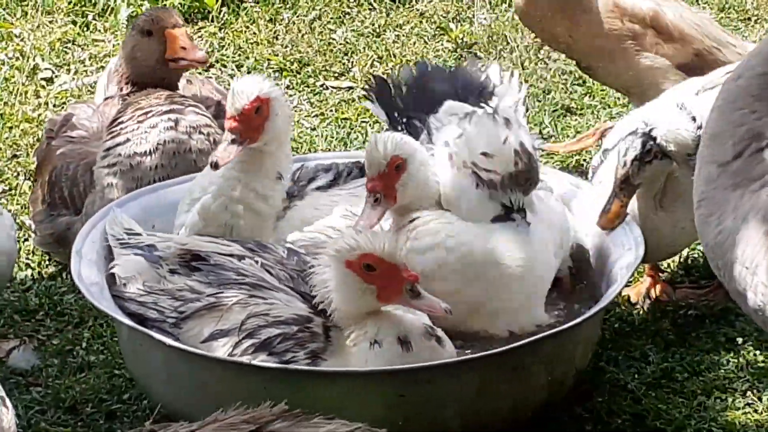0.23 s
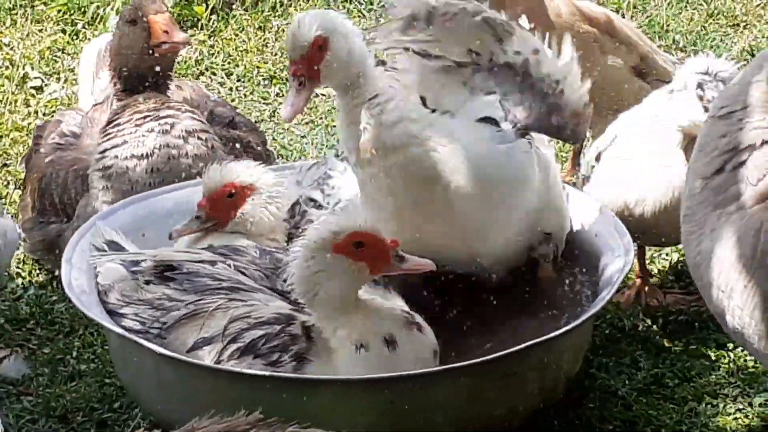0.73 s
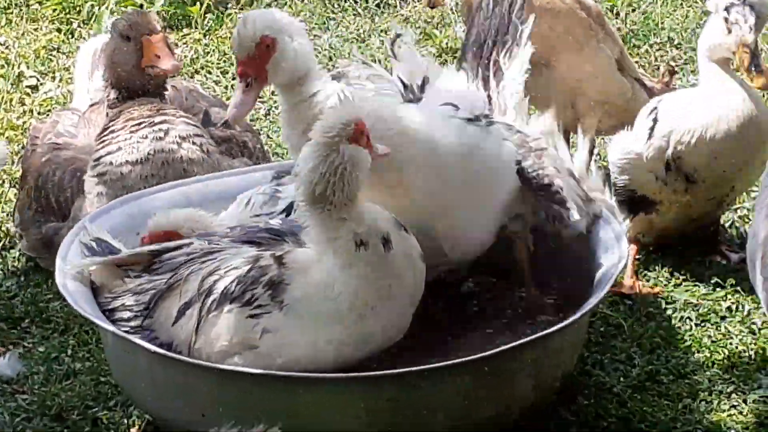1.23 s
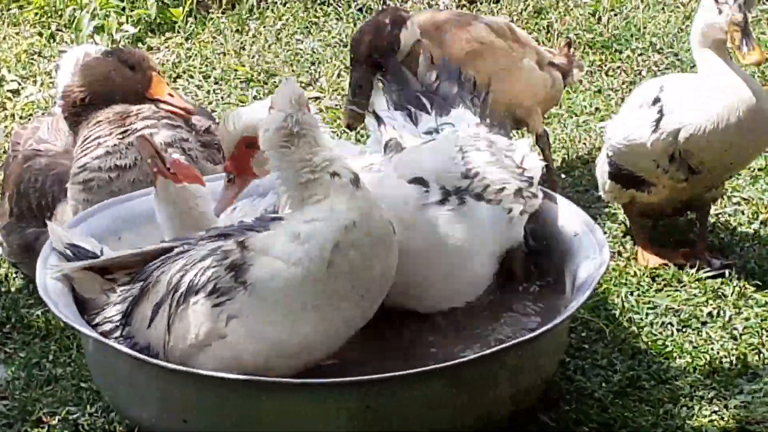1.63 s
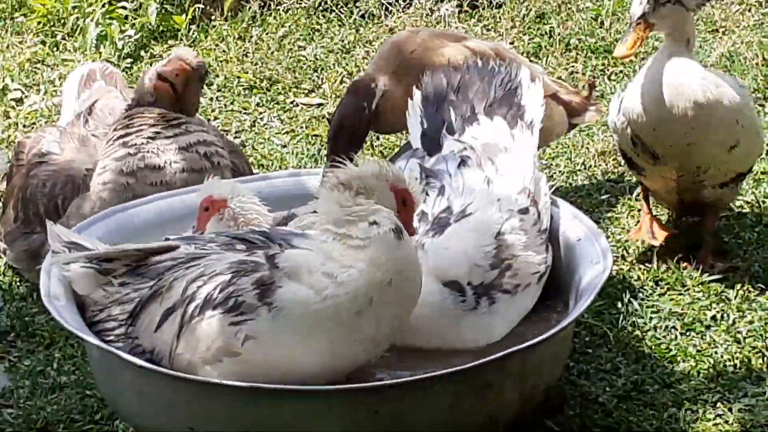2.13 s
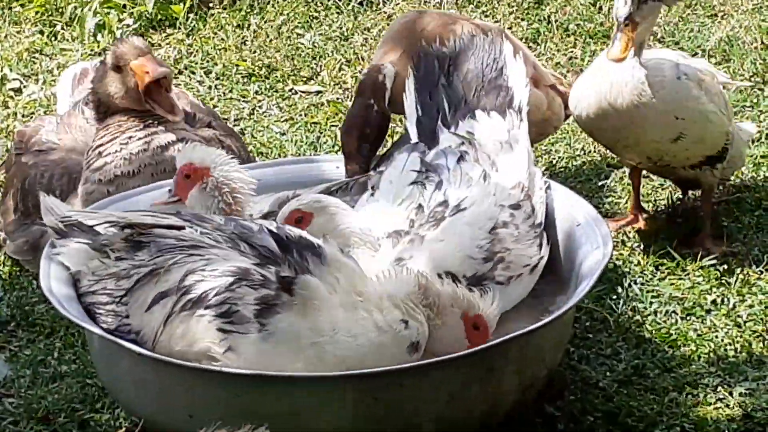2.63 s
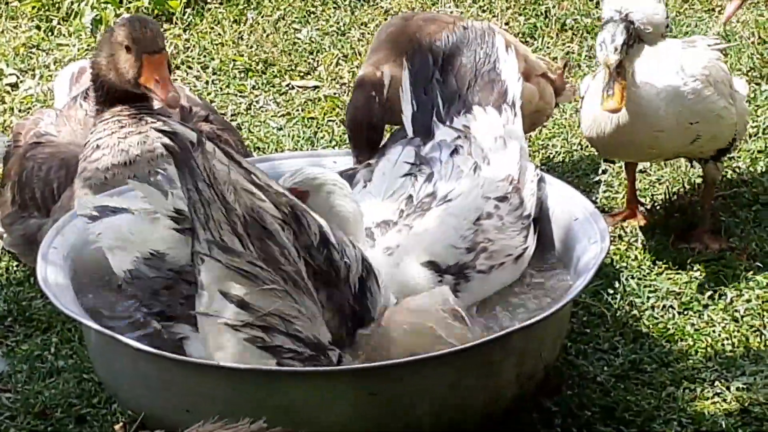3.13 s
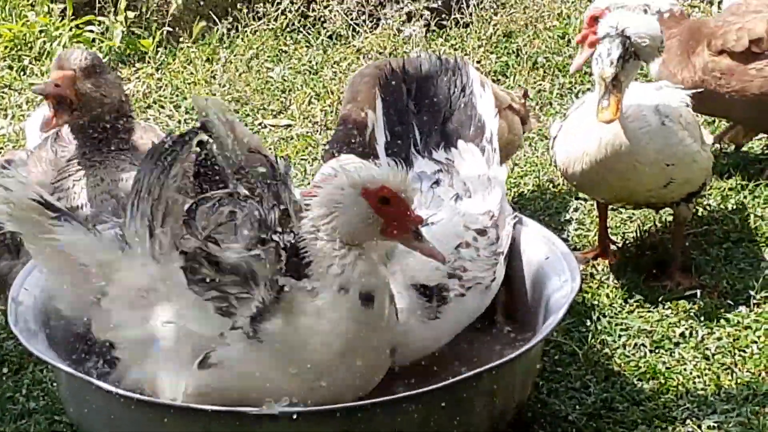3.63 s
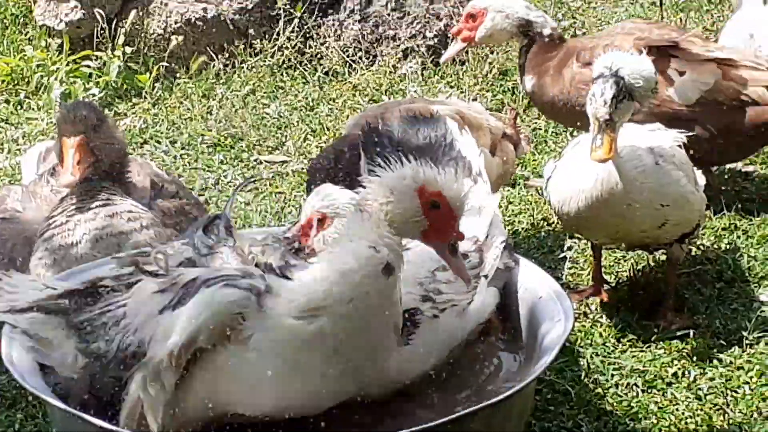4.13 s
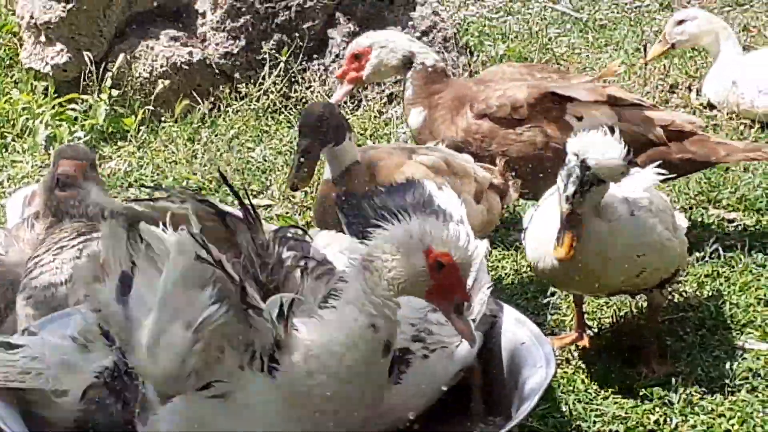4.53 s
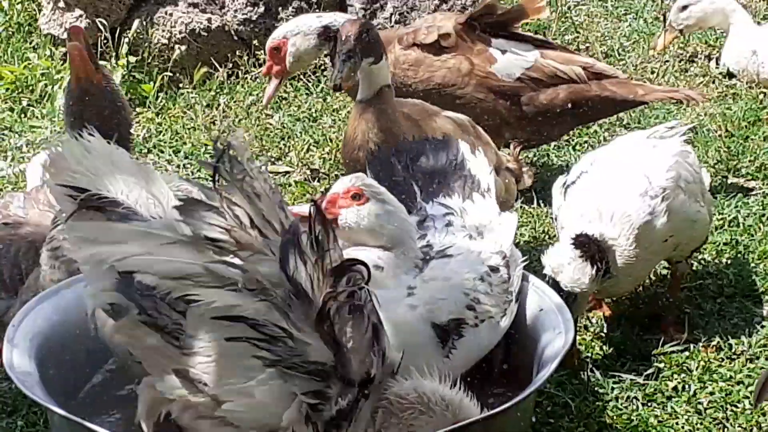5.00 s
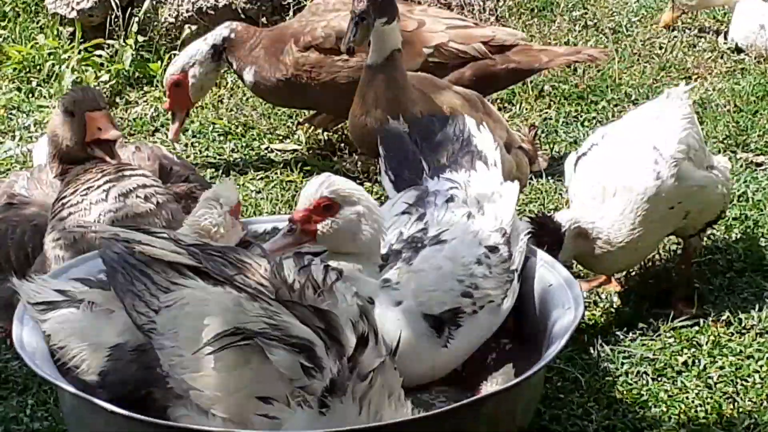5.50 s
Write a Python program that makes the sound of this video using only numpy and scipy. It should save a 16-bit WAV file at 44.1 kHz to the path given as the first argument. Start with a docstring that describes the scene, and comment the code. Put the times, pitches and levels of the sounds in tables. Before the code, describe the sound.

Close outdoor stereo of ducks bathing in a metal basin. Wind thumps and pops hit the microphone at first while rapid wing beats splash hard and slap the ringing tub. The water then calms to drips and faint gurgles, with a few wind bumps. A second, lighter bout of fluttering and wet flicks follows, with short hoarse quacks, before it settles into quiet drips.

```python
"""Ducks bathe in a metal basin on a lawn, in front of a microphone with two ports. In two bouts of steady
wing beats, noise crackles sweep, slap and spray; a bill dips; basin resonances and sine bubbles ring on.
Flicked drops patter back as bursts and bubbles, and gliding sines gulp. Off to the side, ducks give short
hoarse quacks: harmonics shaped by a throat. Wind presses coloured random pulses on each port separately.
Behind it all lies faint far farmyard air with a low throb."""
import sys
import numpy as np
from scipy import signal
from scipy.fft import rfft, irfft
from scipy.io import wavfile
from scipy.ndimage import uniform_filter1d

SR = 44100
rng = np.random.default_rng(int(sys.argv[2]) if len(sys.argv) > 2 else 0)


def master_out(mix):
    """Clip the mix to full scale and print it as 16-bit PCM to the path in sys.argv[1]."""
    frames = np.transpose(np.atleast_2d(mix))
    ceiling = np.clip(frames, -1, 1)
    pcm = np.round(ceiling * 32767).astype(np.int16)
    wavfile.write(sys.argv[1], SR, pcm)


N = 254016
T = np.arange(N) / SR  # seconds
CUTOFF_HZ = 16100

# Event levels below are those before each source's own mix gains; left_right_db is positive to the left.
# Slaps of wings and a dip of a bill on the water: start_s, level_db, spray_db (re slap),
# first_pocket_hz, second_pocket_hz, contact_s, basin_pitch_ratio
SLAPS = [(0.5899, -22, -4, 1980, 3030, 0.0031, 1.16), (0.712, -23, -10, 1810, 2820, 0.004, 0.92),
         (0.944, -17.5, -29, 1890, 2960, 0.0057, 1), (1.1879, -26.5, -24, 1630, 3540, 0.0014, 1.06),
         (1.298, -15.5, -4, 1698, 2730, 0.0049, 1.1), (1.4176, -17, -2, 1820, 3540, 0.002, 1.05),
         (1.537, -19, -2.5, 1213, 1780, 0.0058, 1.02), (3.267, -32.5, -6, 1720, 1900, 0.002, 0.91),
         (4.036, -35.5, 2.5, 1870, 3280, 0.021, 0.9), (4.391, -28.5, -0.5, 1580, 3050, 0.012, 1.05),
         (4.512, -27, 0, 3620, 2850, 0.0016, 0.98), (4.625, -33.5, -1, 1440, 2800, 0.013, 1.45)]
# Single flicks of feathers and flung drops, loud and faint: start_s, level_db, treble_db (re flick)
FLICKS = [(0.0987, -30, -5), (0.57, -25.5, -16), (0.8267, -28.5, -21), (1.023, -35.5, -16),
          (1.056, -35, -16), (1.0722, -26, -14), (1.1756, -25.5, -13), (1.3833, -32.5, -1.5),
          (0.366, -27, -15), (2.3532, -37.5, -29), (3.1847, -31, -27), (3.5538, -45, 6.5),
          (3.696, -38.5, -3), (3.812, -46, 4), (3.9222, -27, -6.5), (4.0503, -38.5, 2), (4.263, -34, -3),
          (4.351, -27.5, -24), (4.5134, -26.5, -14), (4.532, -39, -20), (4.669, -31, -20),
          (4.9123, -26.5, -11), (4.98, -34, -30), (5.011, -35.5, -6), (5.043, -41, -4)]
# Large eddies that thud on the ports: peak_s, level_db, pitch_hz, left_right_db
EDDIES = [(0.093, -13.5, 306, 10), (0.187, -15, 316, -9), (0.3977, -8, 557, -12), (0.407, -8.5, 420, -25),
          (1.7136, -17, 380, -15), (1.739, -17, 467, -7), (1.748, -22.5, 403, -19),
          (2.5178, -25.5, 247, -4)]
# Hoarse quacks: start_s, length_s, first_pitch_hz, last_pitch_hz, throat_hz, level_db (at the middle)
QUACKS = [(0.22, 0.15, 100, 106.4, 950, -42), (3.889, 0.14, 111.7, 105.3, 1313, -34),
          (3.98, 0.086, 105.8, 110.4, 1070, -38), (4.244, 0.14, 113.6, 117.8, 1390, -34),
          (4.989, 0.17, 98.7, 96.5, 820, -43)]
# Resonances of the basin and the air in it: pitch_hz, width_hz, level_db
BASIN_MODES = [(757, 42, 14), (1062, 127, 11), (1100, 230, -0.5), (1734, 220, 8), (1960, 140, 1.5),
               (2758, 100, 9.5), (3700, 130, 1.5)]
# Spectra of the slap, spray, sweep, flick, slosh and patter: pitch_hz, level_db
SLAP_SPECTRUM = [(150, -12), (500, -1), (800, -8.5), (1450, -5.5), (1850, -2.5), (2400, -19), (2900, -2),
                 (4300, -3), (6500, -25), (16000, -70)]
SPRAY_SPECTRUM = [(1500, -73), (4000, 11.5), (6800, 9), (9000, 0), (11500, 8.5), (14500, 7.5), (16500, -26)]
SWEEP_SPECTRUM = [(150, -21.5), (400, 9.5), (900, -7), (1800, -1.5), (2400, -10), (3000, -6.5),
                  (4300, -5.5), (7000, -7), (9000, -28), (12000, -4.5), (16000, -17)]
FLICK_SPECTRUM = [(300, 9.5), (1000, -0.5), (1900, 11.5), (2400, -0.5), (3300, 12), (4600, 8.5),
                  (7000, 0.5), (9500, -13.5), (16000, -5)]
SLOSH_SPECTRUM = [(200, -1.5), (600, -7), (1100, 3), (1500, -2.5), (1950, 3), (2500, -8.5), (3100, -9),
                  (4500, -25), (8000, -4)]
PATTER_SPECTRUM = [(1200, -32), (3000, 1.5), (4400, 5.5), (5600, -4), (7000, 2.5), (9000, -14),
                   (12000, 1.5), (16000, -11)]
# Spectra of wind rumble, wind flutter and the far farmyard air: pitch_hz, level_db
RUMBLE_SPECTRUM = [(42, -20.5), (68, 2.5), (170, -3.5), (260, -12), (600, -46.5)]
FLUTTER_SPECTRUM = [(40, -13.5), (150, -23.5), (290, -2.5), (420, -1), (1000, -11.5), (1800, -25),
                    (4000, -28), (12000, -50)]
AIR_SPECTRUM = [(179, -16.5), (287, -6.5), (632, -15.5), (2010, -7.5), (3060, -16), (4780, -14),
                (8980, -22.5), (12000, -17), (16000, -25.5)]
# Short sputtering puffs of wind: middle_s, level_db, half_length_s
PUFFS = [(.01, -32, 0.011), (.34, -43, 0.046), (.44, -40, 0.05), (.78, -39.5, 0.03), (1.825, -41, 0.025),
         (2.045, -49, 0.014), (2.3, -42, 0.033), (2.70, -51, 0.032), (2.925, -47, 0.02),
         (5.745, -52, 0.014)]
# How the two ports hear a source: pitch_hz, likeness (0-1), phase_rad (right port), left_right_db
PORTS = [(201, 1, 0, 4.5), (1300, 0, 0.43, 0), (2770, 0.5, -0.4, 1), (4800, 0.12, -0.1, 0),
         (7000, 0, 2.5, -0.5), (10500, 0.24, 4, -3.5), (14600, 0.4, 1, -1.5)]
# Bouts of bathing: first_stroke_s, last_stroke_s, hardest_s, hardest_level_db,
# flick_delay_s (negative: before the stroke), flick_db (re stroke), flick_treble_db (re flick),
# slosh_db, patter_db
BOUTS = [(0.122, 1.54, 0.85, -31, -0.039, -8.5, 1, -45, -51.5),
         (3.333, 4.997, 4.43, -30, 0.033, -4.5, -10, -46.5, -45.5)]
# Gusts on top of the breeze: middle_s, half_length_s, rumble_db, rumble_left_right_db, flutter_db
GUSTS = [(0, 0.05, -38.5, 21, -24.5), (0.138, 0.018, -28, 2, -44), (0.44, 0.096, -45, 29, -30.5),
         (0.428, 0.36, -48, 28.5, -32), (1.718, 0.036, -38.5, 5, -35.5), (1.97, 0.084, -46.5, 3, -64),
         (2.5, 0.088, -42, 8.5, -41.5), (3.745, 0.17, -54.5, 22, -66), (4.3, 0.14, -51, 19.5, -42),
         (5.76, 0.051, -57, 7, -44.5)]
# Single drips that ring: start_s, level_db, pitch_hz
DRIPS = [(1.109, -32, 4700), (2.013, -37, 4470), (2.163, -31.5, 1870), (2.224, -41, 1720),
         (2.8831, -34, 2010), (3.337, -33, 1720), (3.597, -32, 3050), (5.5207, -41.5, 2780),
         (5.6164, -42.5, 1930)]
# Large pockets of air that gulp under the ducks: start_s, length_s, first_pitch_hz, last_pitch_hz, level_db
GULPS = [(0.148, 0.067, 198, 346, -32), (0.468, 0.055, 350, 430, -30), (4.359, 0.019, 274, 318, -34),
         (5.71, 0.061, 395, 430, -48)]
# Sharp pops of air in the right port: peak_s, level_db
POPS = [(0.0144, -8.5), (0.033, -13), (0.0643, -11.5), (0.233, -15.5), (0.25, -12), (0.307, -13.5),
        (0.3288, -10.5), (0.3723, -13), (0.3868, -12), (0.4301, -7), (0.4658, -8), (0.4853, -12.5),
        (0.556, -13), (0.629, -15), (0.787, -15), (1.773, -19), (2.3323, -20), (2.675, -23.5), (2.94, -31),
        (3.075, -25.5), (3.1019, -22.5), (3.119, -26)]

# Wing pace, rounded to whole strokes per bout; effort one second from its top; half length of a sweep
STROKES_PER_S, EFFORT_FALL_DB, SWEEP_HALF_S = 8.4, 23.5, 0.011
# Water between the bouts, and how fast it is stirred up and settles
CALM_SLOSH_DB, CALM_PATTER_DB, STIR_DB_PER_S, SETTLE_DB_PER_S = -56, -60, 42, 53
PATTER_FOLLOWS = 0.14  # share of the swing in effort
# A light breeze, which drops to a lull near the end
BREEZE_RUMBLE_DB, BREEZE_FLUTTER_DB, BREEZE_PAN_DB = -58, -46.5, 13.5
LULL_S, LULL_FALL_S, LULL_DB = 5.1, 0.25, -18.5
# Draught of each slap at the ports: level re the slap, delay, half length
DRAUGHT_DB, DRAUGHT_LAG_S, DRAUGHT_HALF_S = -28, 0.042, 0.039
# Throat: half width of the main resonance; place, half width and level of the upper one
THROAT_WIDTH_HZ, UPPER_HZ, UPPER_WIDTH_HZ, UPPER_DB = 88, 1780, 150, -12
QUACK_FADE_DB = 5  # drop from the middle of a quack to either end


def from_db(db):
    """Decibels to gain."""
    return 10 ** (np.asarray(db) / 20)


def rms_one(x):
    """Scale to rms 1."""
    return x / np.sqrt(np.mean(x ** 2) + 1e-20)


def log_bins():
    """Log frequency of every Fourier bin, offset by 1 Hz to stay finite at zero."""
    return np.log(np.arange(N // 2 + 1) * SR / N + 1)


def at_bins(points):
    """A table over log frequency, read at every Fourier bin."""
    hz, value = np.transpose(points)
    return np.interp(log_bins(), np.log(hz), value)


def colour(x, spectrum):
    """Minimum-phase filter: nothing sounds before its cause."""
    cepstrum = irfft(np.log(from_db(at_bins(spectrum))), N)
    causal = cepstrum * 2 * (np.arange(N) < N // 2)
    return irfft(rfft(x) * np.exp(rfft(causal)), N)


def resonate(x, hz, width_hz):
    """Two-pole resonance with gain 1 on top."""
    r = np.exp(-np.pi * width_hz / SR)
    zeros = np.array([1, 0, -1]) * (1 - r * r) / 2
    poles = [1, -2 * r * np.cos(2 * np.pi * hz / SR), r * r]
    return signal.lfilter(zeros, poles, x)


def stereo(pair):
    """Two unrelated signals become left and right, as alike as the ports hear them; the middle has rms 1."""
    alike, phase, pan_db = (at_bins(np.array(PORTS)[:, [0, k]]) for k in range(1, 4))
    alike = np.clip(alike, 0, 1)
    shared, apart = rfft(pair) * np.sqrt([1 + alike, 1 - alike])
    left = (shared + apart) * from_db(pan_db)
    right = (shared - apart) * np.exp(1j * phase)
    ports = irfft(np.array([left, right]), N)
    return ports / np.std(ports.mean(axis=0))


def patchy(x, depth_db, per_s, count=15):
    """Above the bass, each narrow band swells and fades by chance on its own; the overall level stays."""
    place = np.interp(log_bins(), np.log([700, CUTOFF_HZ]), [0, count - 1])
    spectrum, out = rfft(x), 0
    for k, chance in enumerate(rng.standard_normal((count, SR))):
        gain = from_db(depth_db * np.interp(T * per_s, np.arange(SR), chance))
        band = irfft(spectrum * np.maximum(1 - np.abs(place - k), 0), N)
        out = out + gain * band
    return out * np.std(x) / np.std(out)


def clicks(per_s, spread_db):
    """Random impulses, many small and a few large."""
    size = from_db(spread_db * np.minimum(rng.exponential(1, N), 4))
    return (rng.random(N) < per_s / SR) * size


def impulses(s, db):
    """Single clicks at given times and levels."""
    out = np.zeros(N)
    np.add.at(out, (np.asarray(s) * SR).astype(int), from_db(db))
    return out


def crackle(per_s, spread_db, burst_s=0.0012):
    """Bursting drops: each is a tiny puff of noise that reaches both sides together."""
    puffs = clicks(per_s, spread_db) ** 2 + 1e-12
    power = signal.lfilter([1], [1, -np.exp(-2 / (burst_s * SR))], puffs)
    return np.sqrt(power) * rng.standard_normal((2, N))


def strike(s, rise_s, hold_s, t60):
    """Envelope that rises, then dies away by 60 dB per t60 seconds after the hold."""
    out, first = np.zeros(N), max(int(s * SR), 0)
    age = T[:min(SR // 2, N - first)]
    decay = from_db(-60 * np.maximum(age - hold_s, 0) / t60)
    out[first:first + len(age)] = np.minimum(age / rise_s, 1) * decay
    return out


def swells(rows):
    """Sum of rounded rises and falls, each at half gain one half length from its middle."""
    return sum(from_db(db) / (1 + np.abs((T - s) / half_s) ** 3) for s, db, half_s in rows)


def panned(pan_db):
    """Left and right gains for a left-right difference."""
    return from_db([[pan_db / 2], [-pan_db / 2]])


def farmyard(throb_db=-59, throb_hz=290, beats_per_s=11.7):
    """Faint, unevenly rustling open air with a low, distant throb: narrow noise that beats in level."""
    air = from_db(-53.5) * patchy(stereo(colour(rng.standard_normal((2, N)), AIR_SPECTRUM)), 2.8, 16)
    drone = stereo(resonate(rng.standard_normal((2, N)), throb_hz, width_hz=105))
    return air + from_db(throb_db) * drone * (1 + 0.49 * np.cos(2 * np.pi * beats_per_s * T))


def airflow():
    """Gains of rumble (per port) and flutter: breeze and gusts, plus the slaps' draught in the rumble."""
    breeze = from_db(LULL_DB * np.clip((T - LULL_S) / LULL_FALL_S, 0, 1))
    draught = swells([(s + DRAUGHT_LAG_S, db + DRAUGHT_DB, DRAUGHT_HALF_S) for s, db, *_ in SLAPS])
    rumble = np.hypot(breeze * from_db(BREEZE_RUMBLE_DB) * panned(BREEZE_PAN_DB), draught)
    flutter = breeze * from_db(BREEZE_FLUTTER_DB)
    for s, half_s, rumble_db, pan_db, flutter_db in GUSTS:
        gust = swells([(s, 0, half_s)])
        rumble = np.hypot(rumble, gust * from_db(rumble_db) * panned(pan_db))
        flutter = np.hypot(flutter, gust * from_db(flutter_db))
    return rumble, flutter


def port_turbulence(spectrum, per_s, spread_db):
    """Lumps of pressure of either sign, unrelated at the two ports; each port has rms 1."""
    lumps = [clicks(per_s, spread_db) * rng.choice([-1, 1], N) for port in range(2)]
    return np.array([rms_one(colour(lump, spectrum)) for lump in lumps])


def thud(s, hz, cycles):
    """A lump of pressure that peaks at s and swings out in a few cycles."""
    return strike(s - .5 / hz, .5 / hz, 1 / hz, cycles / hz) * np.cos(2 * np.pi * hz * (T - s))


def port_pops(thud_db=-5.5, cusp_db=-4, pop_hz=620, pop_cycles=5, cusp_s=0.000084):
    """Air breaks over the right port in sharp cusps, each with a short thud at a pitch of its own."""
    right = np.zeros(N)
    for s, db in POPS:
        cusp = np.exp(-np.minimum(np.abs(T - s) / cusp_s, 20))
        own_hz = pop_hz * 2 ** rng.uniform(-0.43, 0.75)
        right += from_db(db) * (from_db(cusp_db) * cusp + from_db(thud_db) * thud(s, own_hz, pop_cycles))
    return np.array([np.zeros(N), right])


def wind(flutter_db=(-4, 0), puff_db=(-9, 3), puff_hz=750, puff_width_hz=700, eddy_db=-4, eddy_cycles=9):
    """Air presses on the ports: flutter and sputter lean right, breeze rumble leans left, eddies thud."""
    rumble, flutter = airflow()
    out = rumble * port_turbulence(RUMBLE_SPECTRUM, 300, 4.74)
    out += flutter * from_db(flutter_db)[:, None] * port_turbulence(FLUTTER_SPECTRUM, 400, 4.3)
    pops = np.array([clicks(200, 2) for port in range(2)])
    lowpass = signal.butter(2, 1800, fs=SR, output="sos")
    sputter = rms_one(signal.sosfilt(lowpass, resonate(pops, puff_hz, puff_width_hz)))
    out += swells(PUFFS) * from_db(puff_db)[:, None] * sputter
    for s, db, hz, pan_db in EDDIES:
        out += from_db(db + eddy_db) * rms_one(panned(pan_db)) * thud(s, hz, eddy_cycles)
    return out + port_pops()


def effort_db(s, hardest_s):
    """Effort in a bout, re its top: an arch that builds up, then tires."""
    return -EFFORT_FALL_DB * (s - hardest_s) ** 2


def agitation():
    """Gains of slosh and patter: each bout stirs the water up, and it settles afterwards."""
    slosh, patter = from_db(CALM_SLOSH_DB), from_db(CALM_PATTER_DB)
    for first, last, hardest_s, *_, slosh_db, patter_db in BOUTS:
        stirred_db = -STIR_DB_PER_S * np.maximum(first - T, 0) - SETTLE_DB_PER_S * np.maximum(T - last, 0)
        slosh = np.hypot(slosh, from_db(slosh_db + stirred_db))
        follow_db = PATTER_FOLLOWS * effort_db(T, hardest_s)
        patter = np.hypot(patter, from_db(patter_db + stirred_db + follow_db))
    return slosh, patter


def bubbles(low_hz, high_hz, per_s, cycles, spread_db=5.0, count=26):
    """Bubbles of many sizes, per_s of each, ring for a few cycles; two unrelated swarms of rms 1."""
    pitches = np.geomspace(low_hz, high_hz, count)
    born = rng.random((2, N)) < per_s * count / SR
    size = from_db(spread_db * np.minimum(rng.exponential(1, (2, N)), 3))
    kicks = size * rng.choice([-1, 1], (2, N)) * born
    dealt = rng.integers(0, count, (2, N))  # which pitch each bubble gets
    swarm = 0
    for k, hz in enumerate(pitches):
        swarm = swarm + resonate(kicks * (dealt == k) + 1e-18, hz, 2 * hz / cycles) / hz ** .5
    return rms_one(swarm)


def drop_ticks():
    """Larger drops hit the water one by one, each a short tick with one of many pitches."""
    return stereo(bubbles(1200, 13000, per_s=9, cycles=20, spread_db=3.5))


def stirred_water(slosh_db=-5, patter_db=-3.0, drop_db=-7):
    """Paddled water gurgles; drops patter back in clumps, the larger ones tick or drive bubbles under."""
    slosh, patter = agitation()
    gurgle = stereo(colour(bubbles(350, 4500, per_s=22, cycles=20), SLOSH_SPECTRUM))
    clump_band = signal.butter(2, [12, 45], "band", fs=SR, output="sos")
    clumps = from_db(2.2 * rms_one(signal.sosfilt(clump_band, rng.standard_normal(N))))
    fizz = clumps * patchy(stereo(colour(crackle(1500, 3.5), PATTER_SPECTRUM)), 3.5, 50)
    fizz = fizz + .7 * stereo(bubbles(1300, 5000, per_s=6, cycles=45, spread_db=5))
    drops = from_db(patter_db) * fizz + from_db(drop_db) * clumps * drop_ticks()
    return slosh * from_db(slosh_db) * gurgle + patter * drops


def strokes():
    """Evenly spaced wing strokes, each with a flick: rows for the sweeps and rows for the flicks."""
    sweep_rows, flick_rows = [], []
    for first, last, hardest_s, top_db, flick_s, flick_db, treble_db, *_ in BOUTS:
        for s in np.linspace(first, last, round((last - first) * STROKES_PER_S) + 1):
            db = top_db + effort_db(s, hardest_s)
            sweep_rows.append((s, db, SWEEP_HALF_S))
            flick_rows.append((s + flick_s, db + flick_db, treble_db))
    return sweep_rows, flick_rows


def bubble_ring(s, hz, rise_s, t60):
    """One bubble: a sine that starts at s and dies away."""
    out = strike(s, rise_s, 0, t60)
    on = out > 0
    out[on] *= np.sin(2 * np.pi * hz * (T[on] - s))
    return out


def air_pockets(s, hz, contact_s, cycles=50, scatter=0.237, small_db=-9, count=4):
    """One large pocket of air and a few weaker ones pinch off around the contact and ring."""
    out = bubble_ring(s + 0.001448, hz, 0.0001, cycles / hz)
    for delay, size in rng.random((count, 2)):
        own_hz = hz * np.exp(scatter * (4 * size - 2))
        out += from_db(small_db) * bubble_ring(s + delay * contact_s, own_hz, 0.0011, cycles / own_hz)
    return out


def snaps(rows, snap_db=14):
    """A flick begins with one sharp crack."""
    s, db, _ = np.transpose(rows)
    return colour(impulses(s, db + snap_db), FLICK_SPECTRUM)


def flicks(tick_db=-6, spray_db=-3, pocket_db=-6, pocket_hz=3200, tick_t60=0.036, tail_db=-20, tail_t60=0.42):
    """Short wet ticks, each trapping a little air, with a weak tail."""
    tick = spray = pockets = 0
    _, flick_rows = strokes()
    rows = FLICKS + flick_rows
    for s, db, treble_db in rows:
        tail = from_db(tail_db) * strike(s, 0.001, 0.022, tail_t60)
        shape = from_db(db) * (strike(s, 0.00018, 0.0024, tick_t60) + tail)
        tick = tick + shape
        spray = spray + shape * from_db(treble_db)
        own_hz = pocket_hz * 2 ** rng.uniform(-0.43, 0.47)
        pockets = pockets + from_db(db) * air_pockets(s, own_hz, 0.0021)
    return (snaps(rows)
            + from_db(tick_db) * tick * stereo(colour(crackle(4000, 1.8), FLICK_SPECTRUM))
            + from_db(pocket_db) * pockets
            + from_db(spray_db) * spray * stereo(colour(crackle(7400, 5.1), SPRAY_SPECTRUM)))


def wing_sweeps(level_db=-5.0, bubble_db=-6, drop_db=-11):
    """Each stroke swells and fades as wet feathers scrape unevenly, shed drops and churn bubbles."""
    scrape = from_db(level_db) * patchy(stereo(colour(crackle(3000, 8.7), SWEEP_SPECTRUM)), 5, 110)
    churn = from_db(bubble_db) * stereo(bubbles(700, 7000, per_s=45, cycles=26))
    sweep_rows, _ = strokes()
    return swells(sweep_rows) * (scrape + churn + from_db(drop_db) * drop_ticks())


def gulps():
    """A large pocket of air swells into a short note that glides as the pocket changes shape."""
    out = np.zeros(N)
    for s, length, first_hz, last_hz, db in GULPS:
        on = (T > s) & (T < s + length)
        along = (T[on] - s) / length
        turns = np.cumsum(first_hz + (last_hz - first_hz) * along) / SR
        out[on] += from_db(db) * np.sin(np.pi * along) * np.sin(2 * np.pi * turns)
    return out


def quacks(jitter=0.009, rasp_db=-9, lag_s=0.00044, count=22):
    """A rough buzzy voice through a throat that glides with the pitch; it reaches the left port later."""
    source = np.zeros(N)
    for start, length, first_hz, last_hz, throat_hz, top_db in QUACKS:
        on = (T > start) & (T < start + length)
        hz = np.linspace(first_hz, last_hz, on.sum())
        db = top_db - QUACK_FADE_DB * np.linspace(-1, 1, len(hz)) ** 2
        waver = rms_one(uniform_filter1d(rng.standard_normal(len(hz)), size=300))
        turns = np.cumsum(hz * (1 + jitter * waver)) / SR
        k = np.arange(5, count)[:, None]  # harmonic numbers
        place = k * hz.mean()  # each harmonic's place on the throat's response
        throat = (1 / (1 + 1j * (place - throat_hz) / THROAT_WIDTH_HZ) ** 2
                  + from_db(UPPER_DB) / (1 + 1j * (place - UPPER_HZ) / UPPER_WIDTH_HZ) ** 2)
        rasp = rms_one(uniform_filter1d(rng.standard_normal((len(k), len(hz))), size=300))
        harmonics = throat * (1 + from_db(rasp_db) * rasp) * np.exp(2j * np.pi * k * turns)
        voice = rms_one(harmonics.real.sum(axis=0))
        source[on] += voice * from_db(db) * signal.windows.tukey(len(hz), .1)
    return np.array([np.interp(T - lag_s, T, source), source])


def closing_pocket(s, hz, level_db=-2, cycles=100):
    """The hollow in the water closes over a pocket of air, which rings for more cycles."""
    return from_db(level_db) * bubble_ring(s, hz, 0.00039, cycles / hz)


def body(x, modes):
    """Resonances in parallel; they cancel into notches between their peaks."""
    return sum(from_db(db) * resonate(x, hz, width) for hz, width, db in modes)


def basin_ring(impact, ring_db, ring_t60, hollow_db):
    """Each impact rings the basin; ducks and water shift, so its resonances lie differently between impacts."""
    out, air = np.zeros((2, N)), stereo(rng.standard_normal((2, N)))
    for s, db, *_, contact_s, ratio in SLAPS:
        span = slice(int(s * SR), int(s * SR) + SR // 3)
        drive = from_db(hollow_db) * impact[:, span] * (T[span] < s + .1)
        ringing = strike(s, 0.0074, contact_s, ring_t60)[span] * air[:, span]
        drive = drive + from_db(db + ring_db) * ringing
        out[:, span] += body(drive, [(hz * ratio, width, level_db) for hz, width, level_db in BASIN_MODES])
    return out


def slaps_and_dip(smack_db=-8.0, hollow_db=-7, pocket_db=2.0, ring_db=-5.5, spray_db=-7, burst_db=9,
                  burst_t60=0.0096, wash_db=-19, crack_db=16, crack_spray_db=-10, crack_lag_s=0.0012,
                  smack_t60=0.048, ring_t60=0.15, spray_t60=0.061, wash_t60=0.12):
    """A wing or bill hits, traps air and throws spray; the hollow closes with a second crack; the basin rings."""
    smack = spray = wash = pockets = cracks = bright_cracks = 0
    for s, db, spray_rel_db, first_hz, second_hz, contact_s, _ in SLAPS:
        gain, close_s = from_db(db), s + contact_s
        smack = smack + gain * strike(s, 0.00058, contact_s, smack_t60)
        pockets = pockets + gain * (air_pockets(s, first_hz, contact_s) + closing_pocket(close_s, second_hz))
        wash = wash + gain * strike(s, 0.003, contact_s, wash_t60)
        burst = from_db(burst_db) * strike(close_s, 0.00052, 0, burst_t60)
        spray = spray + from_db(db + spray_rel_db) * (strike(s, 0.00038, contact_s, spray_t60) + burst)
        pair = impulses([s + crack_lag_s, close_s], db + crack_db)
        cracks = cracks + pair
        bright_cracks = bright_cracks + pair * from_db(spray_rel_db + crack_spray_db)
    splash = patchy(stereo(colour(crackle(5000, 3.6), SLAP_SPECTRUM)), 2.3, 200)
    impact = from_db(smack_db) * smack * splash + colour(cracks, SLAP_SPECTRUM)
    wash_noise = patchy(stereo(colour(crackle(2800, 12.0), SWEEP_SPECTRUM)), 1.3, 69.65)
    return (impact + basin_ring(impact, ring_db, ring_t60, hollow_db)
            + colour(bright_cracks, SPRAY_SPECTRUM)
            + from_db(pocket_db) * pockets
            + from_db(wash_db) * wash * wash_noise
            + from_db(spray_db) * spray * stereo(colour(crackle(3340, 3.2), SPRAY_SPECTRUM)))


def drips(ring_db=-2, tick_db=-9, tick_t60=0.057, cycles=90, rise_per_s=2.5):
    """A drop ticks on the surface and leaves a bubble that rings, rising in pitch."""
    tick = ring = 0
    for s, db, hz in DRIPS:
        tick = tick + from_db(db) * strike(s, 0.0014, 0.0008, tick_t60)
        turns = hz * (T - s) * (1 + rise_per_s * (T - s) / 2)
        ring = ring + from_db(db) * strike(s, 0.00038, 0, cycles / hz) * np.sin(2 * np.pi * turns)
    splash = stereo(colour(crackle(5000, 3.0), SLAP_SPECTRUM))
    return from_db(ring_db) * ring + from_db(tick_db) * tick * splash


def scene():
    """The basin in front, quacks to the side, wind on the microphone, the farmyard far off."""
    surroundings = farmyard() + wind()
    bathing = stirred_water() + flicks() + wing_sweeps() + gulps() + slaps_and_dip() + drips()
    return surroundings + bathing + quacks()


def record(dry):
    """The loudest peaks are rounded and the top is cut."""
    lowpass = signal.ellip(10, .2, 80, CUTOFF_HZ, fs=SR, output="sos")
    return signal.sosfilt(lowpass, np.tanh(dry))


dry = scene()
out = record(dry)
master_out(out)
```